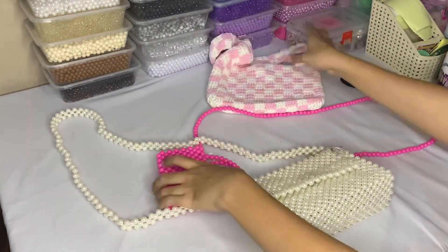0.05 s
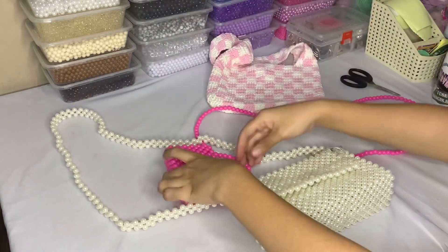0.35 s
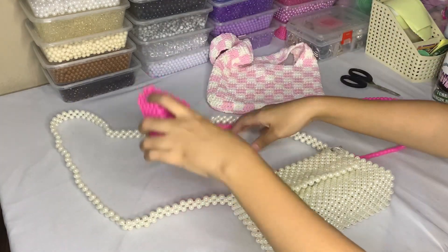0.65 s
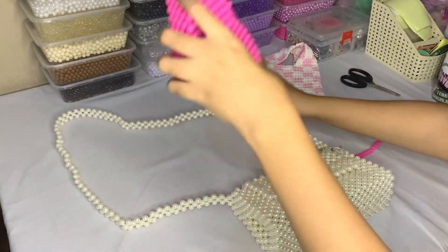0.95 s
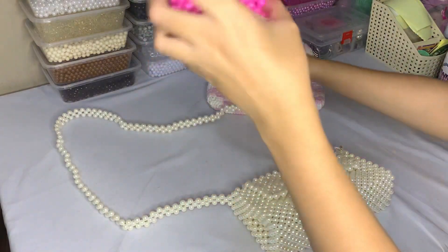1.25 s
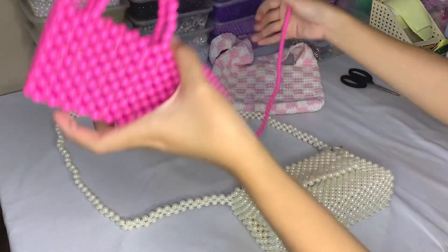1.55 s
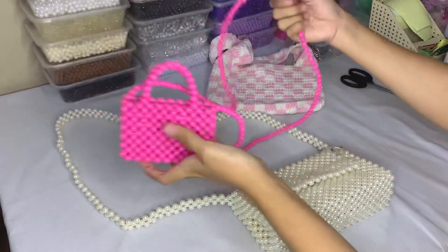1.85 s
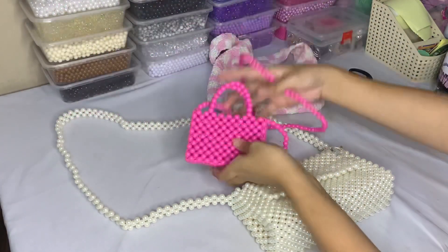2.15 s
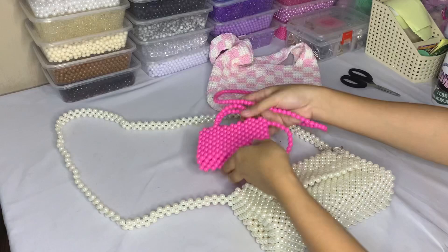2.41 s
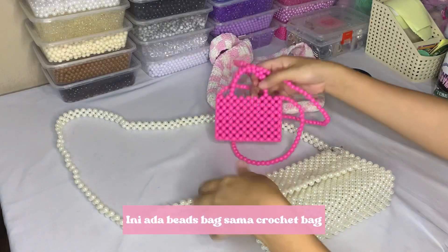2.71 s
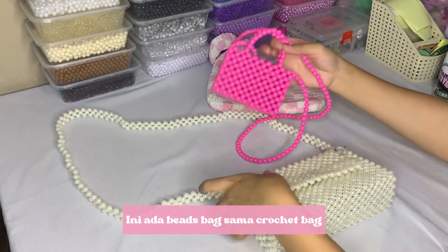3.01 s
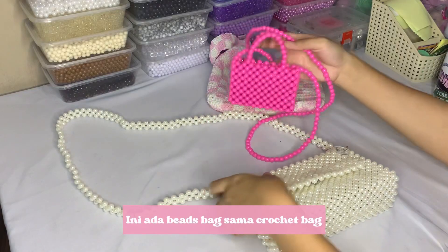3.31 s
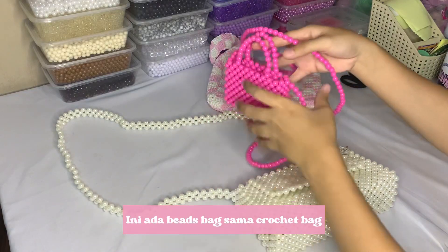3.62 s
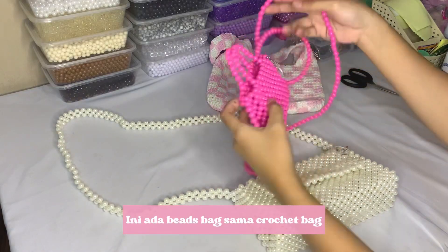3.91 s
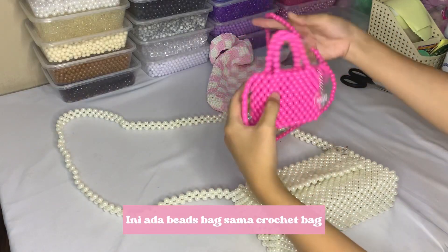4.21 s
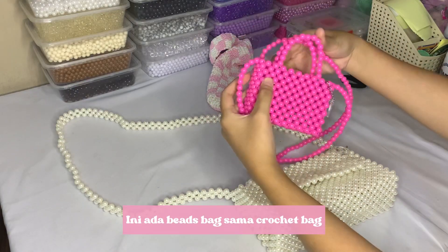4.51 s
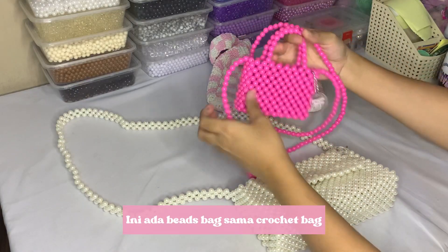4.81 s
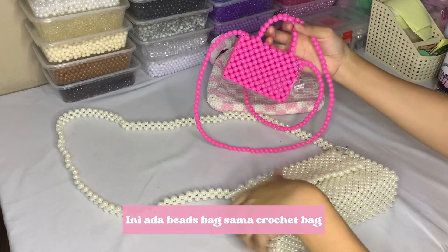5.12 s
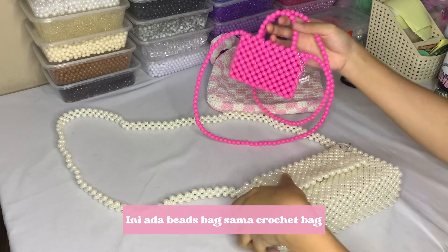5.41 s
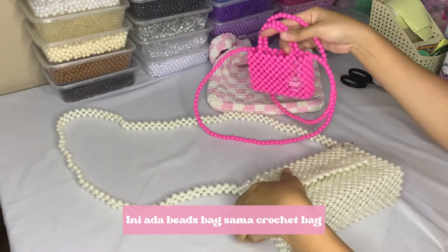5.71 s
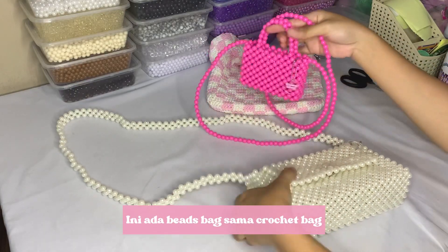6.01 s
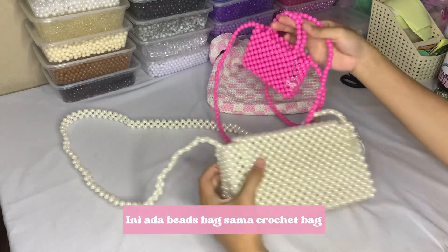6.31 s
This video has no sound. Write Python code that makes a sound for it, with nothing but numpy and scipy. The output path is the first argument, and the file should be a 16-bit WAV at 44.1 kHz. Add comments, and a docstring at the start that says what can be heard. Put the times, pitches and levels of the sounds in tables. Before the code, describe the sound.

Plastic beads click and rattle as beaded bags are handled and bumped on a table, over a low hum and traffic rumble.

```python
"""Bead bags on a table

Bags woven from plastic beads are handled on a cloth-covered table in a small room. A bead strap is
dragged off the table and knocks on it; beads shift and click as a bag is turned; hands and bags bump
down. Each impact excites damped modes in the beads or the table top, and friction adds a fine hiss.
Behind it are a low hum and the rumble of traffic, with one far engine slowly gathering speed."""
import sys
import numpy as np
from scipy import signal
from scipy.fft import rfft, irfft, next_fast_len
from scipy.io import wavfile
from scipy.ndimage import uniform_filter1d

SR = 44100
rng = np.random.default_rng(int(sys.argv[2]) if len(sys.argv) > 2 else 0)


def file_out(sig):
    """Save sig as 16-bit WAV at sys.argv[1]."""
    # one column per channel
    cols = np.atleast_2d(sig).T
    # limit, then scale
    lim = np.clip(cols, -1, 1)
    pcm = np.round(lim * 32767).astype(np.int16)
    wavfile.write(sys.argv[1], SR, pcm)


N = 280035
T = np.arange(N) / SR
GRIP_ATTACK_S, GRIP_SETTLE_S = 0.096, 0.089  # a handling stroke swells, then dies, by 20 dB

# Spectrum of beads clattering on the table. Each row: frequency in Hz, gain in dB.
CLATTER_SPECTRUM = [(100, -8.5), (250, -6), (400, 2.5), (600, 0), (900, -9), (1400, -12.5), (2300, -8),
                    (3500, -13.5), (5000, -14.5), (8000, -13.5)]


def knocks(clatter_t60=0.086, crack_t60=0.012, rise_s=0.00036, cushion_s=0.0023):
    """Cushioned impact: cloth slows the rise of a blow. Returns the clatter and the table's ring."""
    # Strap, bag or hand bumping the table. Each row: start in seconds, relative level in dB,
    # low thud in dB, hard crack in dB, cushioning from 0 to 1, ring over clatter in dB.
    blows = [(0.235, -37.5, -13.5, -8, 0.3, -5.5), (0.334, -41, 1, -9.5, 0.4, -8.5),
             (0.614, -40.5, 0.5, -6, 0.7, -9), (0.802, -41.5, -24, -6, 0, 0),
             (1.414, -24, -12.5, -0.5, 0, 1), (1.424, -32, -0.5, -15, 0.8, -3),
             (1.789, -39, -5, -0.5, 0.12, -8.5), (1.915, -60, 7, -17, 0.4, -7),
             (2.153, -35.5, -7, -21, 0.55, -3.5), (2.308, -37, -4.5, -12.5, 0.13, -10.5),
             (2.714, -47, -12, -28, 0.1, -3), (2.754, -43, 8.5, -27, 0, 0),
             (2.886, -44.5, 1, -13, 0.9, -10), (3.169, -52, -7.5, -11, 0.5, -5),
             (3.381, -41, 6, -13, 0.4, -8), (4.181, -51.5, 0, -9, 0.1, -10), (4.298, -54, 7, 0, 0.52, -8),
             (4.469, -36.5, -1.5, -16, 0.3, -5.5), (5.129, -50, 15.5, -43, 0.48, -3),
             (5.607, -43.5, -9, -28, 0.6, -14), (5.825, -49, 4, -24, 0.6, -19),
             (5.857, -43.5, -5, -28, 0.5, -9), (5.933, -49, 2.5, -21, 0.2, -9),
             (6.099, -47.5, -9, -13, 0.4, -10), (6.318, -54, 6, -14, 0.2, -4)]
    # Spectrum of the first bare contact. Each row: frequency in Hz, gain in dB.
    crack_spectrum = [(400, -19), (1100, 2), (1450, -2.5), (1800, 9), (2400, -18), (2950, -13),
                      (3350, 12.5), (3800, -2.5), (4600, -5), (9000, -22)]
    out, t = np.zeros((2, N)), np.arange(SR // 4) / SR
    boom_hz, boom_s = 109.8, 0.084  # the hollow under the table swells and dies after a bump
    boom = np.sin(np.pi * np.minimum(t / boom_s, 1)) ** 2 * np.sin(2 * np.pi * boom_hz * t)
    for start, db, thud_db, crack_db, cushion, ring_db in blows:
        cushion = np.clip(cushion, 0, 1)
        rise = 1 - np.exp(-t / (rise_s + cushion * cushion_s))
        clatter = unit(colour(noise_burst(t, clatter_t60), CLATTER_SPECTRUM) * rise)
        crack = unit(colour(noise_burst(t, crack_t60), crack_spectrum))
        bare = (1 - cushion) ** 4
        ring = undb(ring_db) * unit(table_ring(t) * rise)
        blow = unit(np.array([clatter + undb(-1) * bare * crack, ring])) / np.sqrt(2)
        contact_spectrum = [(80, thud_db + 9), (420, thud_db + 2.5), (700, 0), (1200, 0.0033),
                            (2200, crack_db), (4000, crack_db - 9.5), (12000, crack_db - 40.5)]
        add(out, start, colour(blow, contact_spectrum) * undb(db - 16))
        add(out[1], start, boom * undb(db + thud_db - 3))
    return out


def table_ring(t, spot_db=4.5):
    """Modal superposition: each spot struck excites the table's modes in a new mix."""
    # The table top's modes. Each row: frequency in Hz, relative level in dB, 60 dB decay in seconds.
    modes = [(241, 0.5, 0.13), (309, -8, 0.15), (398.3, -8, 0.28), (435.5, -3, 0.26), (476, -5, 0.18),
             (641, -14.5, 0.21), (751, -11.5, 0.13), (823, 3, 0.11), (893, 0.5, 0.1), (1059, -5, 0.083),
             (1120, 1.5, 0.062), (1337, -7, 0.17), (1586, -11.5, 0.11), (1728, -11.5, 0.076),
             (1810, -14, 0.08), (2650, -2, 0.087)]
    phases, strengths = rng.random((2, len(modes)))
    ring = np.zeros(len(t))
    for (hz, db, t60), phase, strength in zip(modes, phases, strengths):
        gain = undb(db + spot_db * (2 * strength - 1))
        ring += gain * fade(t, t60) * np.sin(2 * np.pi * (hz * t + phase))
    return unit(ring)


def bead_clicks(rise_s=0.00032, snap_t60=0.008, tone_t60=0.012, rebound_s=0.014, ring_width=0.26):
    """Elastic collision: a bead snaps, rings and rebounds once, with its own pitch and brightness."""
    # Bead striking bead. Each row: start in seconds, relative level in dB, ring pitch in Hz,
    # top treble gain in dB, height of the resonance above the snap in dB.
    collisions = [(0.205, -66.5, 4040, -28, 4), (0.243, -62, 4700, -48, 15), (0.308, -65.5, 6200, -34, -4),
                  (0.336, -64.5, 8970, -17, -5), (0.527, -68, 3370, -24, 2), (0.567, -55.5, 8970, 8, 7),
                  (1.012, -59, 2740, -11, 2), (1.159, -56.5, 9260, -1, 11), (1.198, -69, 3270, -11, -3),
                  (1.217, -64, 5400, -14, 4), (1.321, -57, 4130, -8, -5), (1.35, -55, 2670, -18, 12),
                  (1.362, -52.5, 5440, -8, 2), (1.428, -54.5, 4200, -10, 8), (1.614, -74, 2420, -13, -6),
                  (1.746, -55, 10510, 4.5, 7), (2.09, -63.5, 2460, -14, 7), (2.154, -55, 4390, -20, 1),
                  (2.182, -67, 2500, -10, 7), (2.212, -58, 7200, -16, 5), (2.229, -60.5, 6960, -16, 6),
                  (2.269, -60, 4830, -7, -7), (2.559, -65.5, 4400, -55, -3), (2.662, -63.5, 4500, -53, 11),
                  (2.712, -62, 2670, -11, -7), (2.752, -62, 8530, -28, -3), (2.85, -60, 5430, -23, 5),
                  (3.454, -66, 2500, -30, 9.5), (3.698, -60.5, 4760, -15, 10), (3.735, -62.5, 8660, -5, 3),
                  (3.807, -55.5, 4000, -4, -1), (3.823, -56.5, 5000, 4, 2), (3.854, -59.5, 5700, -42, 5),
                  (3.87, -62, 4600, -39, 20), (3.947, -62.5, 3300, -31, 8), (3.963, -70, 4230, -27, 6),
                  (3.994, -69.5, 3163, -40, 6), (4.011, -71.5, 5660, -40, 10), (4.104, -66.5, 3477, -56, 6),
                  (4.15, -68.5, 8210, -30, -7), (4.261, -52, 13900, 6, -1), (4.476, -61, 7880, -19, 2),
                  (4.493, -61.5, 5060, -18, 3), (4.511, -59.5, 4500, -27, 5), (4.616, -52, 8800, 6, 6),
                  (4.719, -67.5, 3500, -36, 5), (4.861, -73, 3060, -25, 3), (5.013, -67.5, 6500, -25, -3),
                  (5.136, -64.5, 7900, -7, -4), (5.484, -71.5, 4200, -32, 2), (5.521, -66.5, 8300, 0, 0),
                  (5.685, -57, 6120, -32, 16), (5.764, -69.5, 6200, -38, 11), (5.808, -61, 6050, -20, 8),
                  (5.828, -68, 3900, -20, 2), (5.861, -72, 5300, -24, 2), (5.975, -70.5, 4530, -7, -1),
                  (6.034, -74, 4940, -11, 5), (6.127, -67, 4970, -21, 4), (6.15, -72, 9140, -10, 7),
                  (6.187, -67, 2550, -7, -3), (6.258, -65, 2880, -20, -2)]
    # Filter common to all clicks. Each row: frequency in Hz, gain in dB.
    click_filter = [(400, -19.5), (1200, 1.5), (2200, 5.5), (6500, 1.5), (7700, -1), (9300, 7),
                    (11500, -9.5), (15000, -8)]
    out, t = np.zeros(N), np.arange(2048) / SR
    strike = fade(t, snap_t60) * (1 - np.exp(-t / rise_s))
    for start, db, hz, top_db, ring_db in collisions:
        lag = rebound_s * (0.5 + rng.random())
        rebound = undb(-12) * (t > lag) * fade(abs(t - lag), snap_t60)
        resonance = [(hz / (1 + ring_width), 0), (hz, ring_db), (hz * (1 + ring_width), 0)]
        snap = colour(rng.standard_normal(len(t)) * (strike + rebound), resonance)
        snap = colour(snap, [(6000, 0.044), (10500, top_db / 4), (15000, top_db)])
        tone = np.sin(2 * np.pi * hz * t) * fade(t, tone_t60)
        add(out, start, unit(unit(snap) + undb(-7) * unit(tone)) * undb(db - 6))
    return colour(out, click_filter)


def strap_drag():
    """Sliding friction: passing beads and fine rubbing hiss, and force the table into vibration."""
    # The strap sliding over the table. Each row: time in seconds, relative level in dB.
    slide_levels = [(0.45, -72.5), (0.58, -52), (0.7, -59.5), (0.8, -54.5), (0.98, -59), (1.06, -53),
                    (1.18, -51.5), (1.28, -55.5), (1.39, -59), (1.5, -66)]
    # Slips through the hand. Each row: start in seconds, relative level in dB, hold in seconds.
    slips = [(2.2, -68, 0.035), (4.275, -61, 0.05), (6.15, -65.5, 0.052)]
    # The table murmuring under the strap. Each row: time in seconds, relative level in dB.
    murmur_levels = [(0.48, -81), (0.61, -45.5), (0.7, -57.5), (0.8, -56), (0.98, -66), (1.06, -56.5),
                     (1.27, -64), (1.38, -49), (1.46, -80)]
    # Filter on the sliding hiss, with a notch near 11.7 kHz. Each row: frequency in Hz, gain in dB.
    hiss_filter = [(150, -5), (300, 12), (600, 10), (760, 6), (860, 14.5), (950, 9.5), (1100, -0.5),
                   (1400, 6), (2200, 11.5), (4000, 7.5), (6500, 4.5), (7700, 0), (9500, -2.5), (11700, -25),
                   (12700, -9.5), (14800, -10), (16000, -47)]
    # Filter on the fine sizzle, with a notch near 11.7 kHz. Each row: frequency in Hz, gain in dB.
    sizzle_filter = [(7000, -37), (9500, 3), (11700, -17), (12700, 1.5), (15000, -5), (16000, -24)]
    beads = passing_beads()
    rub = contacts(per_s=3000, scatter_db=0, t60=0.025)
    patter = (beads + undb(-4) * rub) * undb(0.1 * wander(18))
    ring = signal.fftconvolve(patter, table_ring(np.arange(SR // 4) / SR))[:N]
    murmur = unit(ring) + unit(colour(patter, CLATTER_SPECTRUM))
    murmur = unit(colour(murmur, [(150, -11), (1000, 9), (1600, 6), (4000, -14)]))
    sliding = envelope(slide_levels) + strokes(slips, GRIP_ATTACK_S, GRIP_SETTLE_S)
    hiss = colour(patter, hiss_filter) / np.std(colour(rub, hiss_filter)) * sliding
    pull = sliding / sliding.max()
    sizzle = unit(colour(patter, sizzle_filter)) * pull ** 2 * undb(-61)
    return hiss + sizzle + undb(-1) * murmur * envelope(murmur_levels)


def passing_beads(jitter=0.14, scatter_db=2.5, t60=0.014):
    """A nearly periodic impact train: bead after bead ticks past, at a rate set by the strap's speed."""
    # Speed of the pull. Each row: time in seconds, beads per second.
    speeds = [(0.5, 60.8), (1.0, 63.2), (1.16, 74), (1.4, 63.6)]
    passed = np.cumsum(np.interp(T, *np.transpose(speeds))) / SR
    offsets, sizes = rng.standard_normal((600, 2)).T
    positions = np.arange(len(offsets)) + jitter * offsets  # in bead spacings
    times = np.interp(positions, passed, T, right=T[-1] + 1)
    gains = undb(scatter_db * np.clip(sizes, -2, 1.3))
    energy = np.bincount((times * SR).astype(int), gains ** 2, N)[:N]
    return unit(colour(snaps(energy, t60), [(1500, -4), (6000, -3.5), (9400, 6), (11500, 0.5)]))


def bead_shifts():
    """Random micro-impacts: woven beads crackle as they settle, and tick faintly while only held."""
    # A bag is gripped or turned. Each row: start in seconds, level in dB, hold in seconds.
    grips = [(0.24, -69, 0.026), (0.35, -63.5, 0.021), (2.1, -69.5, 0.11), (2.31, -66, 0.067),
             (2.57, -69.5, 0.019), (2.72, -74, 0.15), (3.43, -70, 0.02), (3.72, -61.5, 0.01),
             (3.97, -68.5, 0.046), (4.15, -82, 0.12), (4.28, -62, 0.043), (4.5, -62.5, 0.0056),
             (4.67, -70.5, 0.034), (5.22, -77, 0.023), (5.51, -72.5, 0.083), (5.7, -66, 0.035),
             (5.82, -64.5, 0.047), (6.13, -64.5, 0.054), (6.33, -67, 0.018)]
    # Filter on the crackle. Each row: frequency in Hz, gain in dB.
    crackle_filter = [(300, 20.5), (900, 11), (1800, 4.5), (3000, 1), (4800, 10), (6500, -13), (7700, -9.5),
                      (9300, -8), (11000, -22), (15000, -28)]
    crackle = unit(colour(contacts(per_s=500, scatter_db=2.2, t60=0.014), crackle_filter))
    lone = bead_ticks(per_s=110, low_hz=2200, high_hz=10000, t60=0.013)
    held = bead_ticks(per_s=35, low_hz=700, high_hz=3000, t60=0.015)
    moved = unit(crackle + undb(-5) * lone) * strokes(grips, GRIP_ATTACK_S, GRIP_SETTLE_S)
    return moved + held * undb(-81)


def bead_ticks(per_s, low_hz, high_hz, t60, scatter_db=2.5):
    """Damped free vibration: at random moments a lone bead rings at three pitches of its own."""
    out, t = np.zeros(N), np.arange(1024) / SR
    draws = rng.random((1200, 6))
    starts = np.cumsum(0.3 + 1.4 * draws[:, 0]) / per_s
    for start, (_, size, *pitches, phase) in zip(starts, draws):
        if start < T[-1]:
            hz = low_hz * (high_hz / low_hz) ** np.array(pitches)[:, None]
            ring = np.sin(2 * np.pi * (hz * t + phase)).sum(0) * fade(t, t60)
            strength = min(-np.log(1 - size), 3)  # exponentially distributed, capped
            add(out, start, ring * undb(scatter_db * strength))
    return unit(out)


def hand_brushes():
    """Friction on cloth: many small contacts under a hand merge into a dull, uneven rub."""
    # Strokes of the hand. Each row: start in seconds, relative level in dB, hold in seconds.
    brushes = [(2.78, -50.5, 0.04), (2.87, -47, 0.012), (5.24, -57, 0.022), (5.58, -52.5, 0.055),
               (5.83, -50, 0.092), (6.27, -46.5, 0.097)]
    # Spectrum of rubbed cloth. Each row: frequency in Hz, gain in dB.
    cloth_spectrum = [(100, -47), (250, 15.5), (420, 7), (800, 0.5), (1500, -63), (4000, -54)]
    rub = unit(colour(contacts(per_s=700, scatter_db=2, t60=0.02), cloth_spectrum))
    return rub * strokes(brushes, attack_s=0.091, settle_s=0.079) * undb(-5)


def contacts(per_s, scatter_db, t60):
    """A Poisson process: tiny contacts of random size occur independently, each a brief snap."""
    sizes = undb(scatter_db * np.minimum(rng.exponential(size=N), 4))
    return snaps((rng.random(N) < per_s / SR) * sizes ** 2, t60)


def snaps(energy, t60):
    """Incoherent addition: the decaying powers of the contacts sum and shape one noise."""
    power = signal.lfilter([1], [1, -fade(1 / SR, t60) ** 2], energy)
    return unit(rng.standard_normal(N) * np.sqrt(power))


def room(x, wet_db, early_db, early_t60=0.016, t60=0.27, treble_t60=0.074):
    """Reverberation: quick reflections from the table and boxes, then a short tail, in stereo."""
    # Stereo balance. Each row: frequency in Hz, left minus right in dB.
    balance = [(200, 2), (500, 2), (1200, 3), (2300, 0.5), (4400, -3.5), (8000, -2.5)]
    t = np.arange(SR // 2) / SR
    early, low, high = rng.standard_normal((3, 2, len(t)))
    dull_tail = colour(low * fade(t, t60), [(3000, 5), (9000, -0.5), (13000, -10)])
    bright_tail = colour(high * fade(t, treble_t60), [(3000, 6), (9000, 6.5), (13000, -16.5)])
    tail = (dull_tail + bright_tail) * np.clip(t / 0.0016, 0, 1)
    early = early * fade(t, early_t60) * (t > 0.001)
    mid, side = (undb(wet_db) * unit(tail) + undb(early_db) * unit(early)) / np.sqrt(2 * len(t))
    side = colour(side, [(200, -9.5), (900, -1), (2000, 3)])  # long waves reach both sides alike
    response = spread([mid, side], side_db=-2)
    # the direct sound reaches the right a sample sooner
    response[0, 1] += 1
    response[1, 0] += 1
    # the reflections ripple the spectrum finely but leave its broad shape even
    size = next_fast_len(N + len(t), real=True)
    transfer = rfft(response, size)
    transfer /= np.sqrt(uniform_filter1d(abs(transfer) ** 2, size=1400, axis=1))
    left, right = irfft(transfer * rfft(x, size), size)[:, :N] * undb(2)
    return np.array([colour(left, [(hz, db / 2) for hz, db in balance]),
                     colour(right, [(hz, -db / 2) for hz, db in balance])])


def traffic():
    """Low-frequency noise: the rumble of traffic outside, slowly receding."""
    # Course of the rumble. Each row: time in seconds, relative level in dB.
    rumble_levels = [(0, -40), (1.2, -41), (2.2, -45), (3.4, -43.5), (5.1, -49), (6.35, -46)]
    # Spectrum of the rumble. Each row: frequency in Hz, gain in dB.
    rumble_spectrum = [(15, -28), (31, -4.5), (46, -10.5), (62, -18.5), (74, 2.5), (100, -2), (125, -5),
                       (155, -7), (210, -8.5), (300, -20.5), (450, -24), (800, -33.5), (1600, -68),
                       (5000, -88)]
    return stereo_noise(rumble_spectrum, side_db=-9.5) * envelope(rumble_levels) * undb(-1)


def hums(mains_hz=60.02, upper_hz=109.9):
    """Amplitude and phase modulation: a mains hum wavers, and a higher hum swells and sinks."""
    # Course of the higher hum. Each row: time in seconds, relative level in dB.
    upper_levels = [(0, -43), (0.6, -44.5), (1.5, -43), (1.95, -45.5), (3.0, -47), (3.45, -39),
                    (3.9, -52.5), (4.4, -45.5), (6.35, -58)]
    mains = wavering_tone(mains_hz, waver_rad=1, waver_db=4) * undb(-50.5)
    upper = wavering_tone(upper_hz, waver_rad=1.5, waver_db=3.5) * envelope(upper_levels)
    return (mains + upper) * undb(-1)


def far_engine(waver_db=3.5, waver_rad=0.62):
    """Transmission loss: only the lowest firing harmonics pass the walls, each wavering on its way."""
    # The engine's run. Each row: time in seconds, firing rate in Hz, relative level in dB.
    run = [(0, 51.62, -49.5), (0.798, 54.39, -54), (1.7, 58.35, -40.5), (2.15, 59.54, -45),
           (2.551, 60.39, -48), (3.002, 62.97, -47), (4.401, 61.03, -60), (6.35, 60.68, -55.5)]
    # Its harmonics. Each row: multiple of the firing rate, relative level in dB.
    harmonics = [(1, -2), (2, -9.5), (3, -4), (4, -17.5), (5, -20)]
    times, firing_hz, levels_db = np.transpose(run)
    phase = 2 * np.pi * np.cumsum(np.interp(T, times, firing_hz)) / SR
    tone = np.zeros(N)
    for order, db in harmonics:
        gain = undb(db + waver_db * wander(14))
        tone += gain * np.sin(order * phase + waver_rad * wander(16))
    return np.sqrt(2) * tone * undb(np.interp(T, times, levels_db))


def background_hiss():
    """Stationary broadband noise: a faint, steady background hiss."""
    # Filter on the hiss, with a notch near 11.5 kHz. Each row: frequency in Hz, gain in dB.
    hiss_filter = [(100, 19), (500, 10), (1200, 2.5), (2500, -3), (5000, -14), (9500, -11.5), (11500, -25),
                   (14000, -15), (15500, -34)]
    return stereo_noise(hiss_filter, side_db=-1) * undb(-68)


def wavering_tone(hz, waver_rad, waver_db):
    """A sinusoid whose phase and level wander."""
    phase = 2 * np.pi * hz * T + waver_rad * wander(12)
    return np.sqrt(2) * np.sin(phase) * undb(waver_db * wander(14))


def wander(per_s):
    """Linearly interpolated random values with a spread near 1."""
    step = int(SR / per_s)
    stairs = np.repeat(rng.standard_normal(N // step + 1), step)
    return 1.3 * uniform_filter1d(stairs, step)[:N]


def strokes(rows, attack_s, settle_s):
    """Gain of hand movements, summed in power: each rises 20 dB per attack_s, holds and dies down."""
    power = np.zeros(N)
    for start, db, hold in rows:
        before = np.maximum(start - T, 0) / attack_s
        after = np.maximum(T - start - hold, 0) / settle_s
        power += undb(db - 20 * (before + after)) ** 2
    return np.sqrt(power)


def envelope(rows):
    """Gain along rows of seconds and dB, silent outside them."""
    times, db = np.transpose(rows)
    return undb(np.interp(T, times, db, left=-np.inf, right=-np.inf))


def colour(x, points):
    """Minimum-phase filter through points of Hz and dB; folding the cepstrum makes it causal."""
    size = next_fast_len(x.shape[-1] + 4096)
    size += size % 2
    hz, db = np.transpose(points)
    grid = np.maximum(np.fft.rfftfreq(size, 1 / SR), 1)
    magnitude = undb(np.interp(np.log(grid), np.log(hz), db))
    cepstrum = irfft(np.log(magnitude))
    cepstrum[1:size // 2] *= 2
    cepstrum[size // 2 + 1:] = 0
    return irfft(rfft(x, size) * np.exp(rfft(cepstrum)))[..., :x.shape[-1]]


def noise_burst(t, t60):
    """Exponentially decaying white noise."""
    return rng.standard_normal(len(t)) * fade(t, t60)


def stereo_noise(spectrum, side_db):
    """Partly coherent stereo from two independent filtered noises."""
    return spread(unit(colour(rng.standard_normal((2, N)), spectrum)), side_db)


def spread(pair, side_db):
    """Mid and side signals to left and right."""
    return pair[0] + np.array([[1], [-1]]) * undb(side_db) * pair[1]


def fade(t, t60):
    """Exponential decay by 60 dB in t60 seconds."""
    return np.exp(-np.log(1000) * t / t60)


def add(out, start, sound):
    """Superpose a sound from its start in seconds."""
    i = max(int(start * SR), 0)
    out[..., i:i + sound.shape[-1]] += sound[..., :max(N - i, 0)]


def undb(db):
    """Decibels to gain."""
    return 10 ** (np.asarray(db) / 20)


def unit(x):
    """Scale to rms 1."""
    return x / np.sqrt(np.mean(x ** 2))


def scene():
    """Superposition in the room: the broad table top is heard more directly than the beads."""
    clatter, ring = knocks()
    table = room(clatter, wet_db=-4, early_db=-11) + room(ring, wet_db=-5, early_db=-17)
    handling = bead_clicks() + strap_drag() + bead_shifts() + hand_brushes()
    handling = room(handling, wet_db=-2, early_db=-5)
    drone = traffic() + hums()
    hiss = background_hiss()
    lean_right = undb([[-0.4], [0.4]])
    return table + handling + (drone + far_engine()) * lean_right + hiss


def record(dry, cutoff_hz=16050):
    """A steep elliptic low-pass filter removes the highest treble."""
    return signal.sosfilt(signal.ellip(8, 0.2, 80, cutoff_hz, fs=SR, output="sos"), dry)


dry = scene()
out = record(dry)
file_out(out)
```